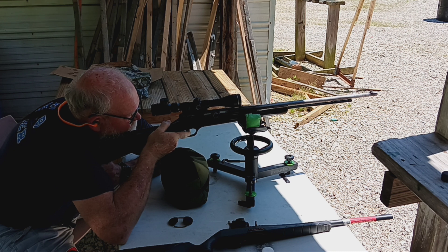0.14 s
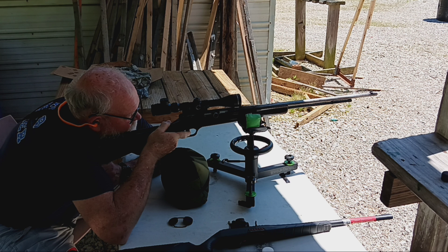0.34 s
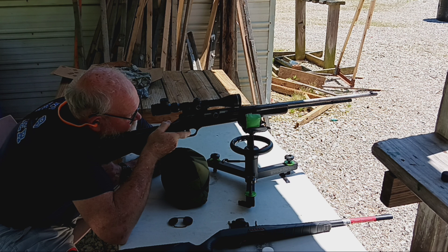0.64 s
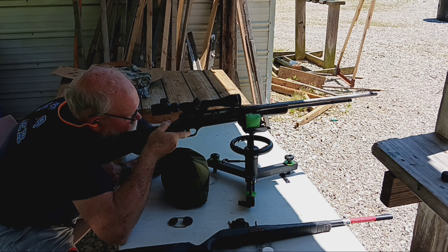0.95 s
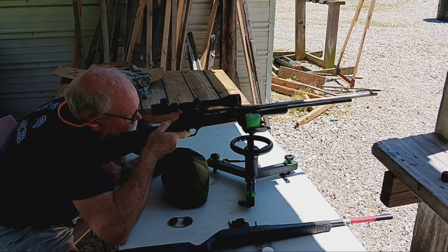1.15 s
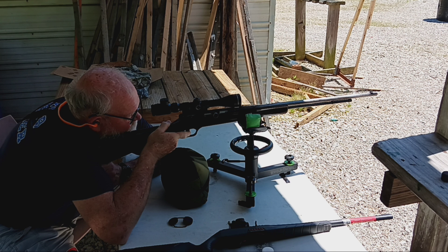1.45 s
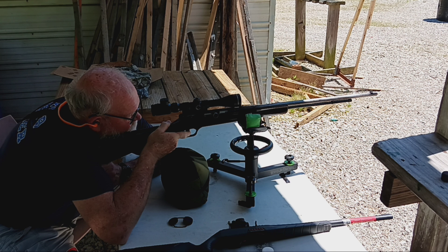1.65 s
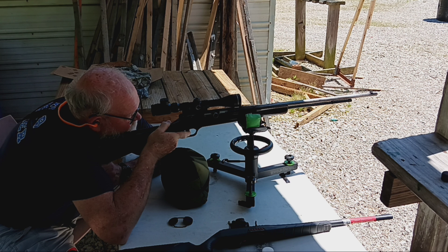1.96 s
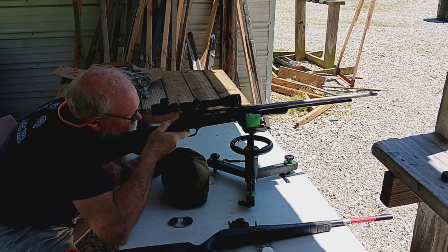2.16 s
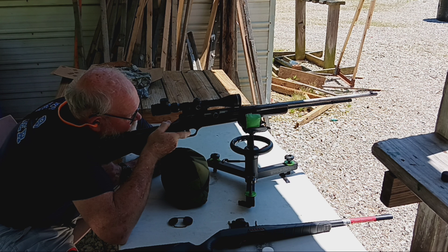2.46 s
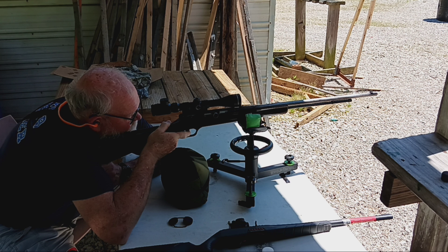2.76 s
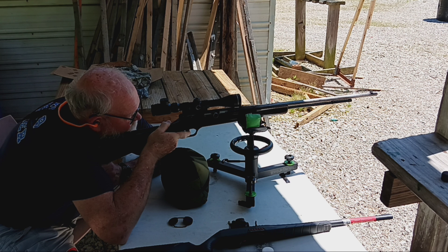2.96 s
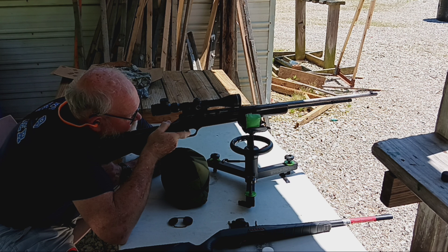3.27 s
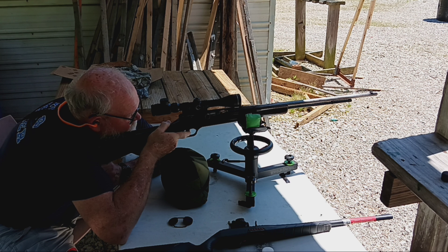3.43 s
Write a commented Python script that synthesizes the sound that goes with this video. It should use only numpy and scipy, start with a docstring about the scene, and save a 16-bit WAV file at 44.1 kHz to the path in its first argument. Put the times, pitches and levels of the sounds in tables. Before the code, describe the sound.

One overloading small-bore rifle shot after three quiet seconds of birds, faint ticks and scuffs

```python
"""Outdoor rifle range: a small-bore rifle is fired once from a roofed bench, overloading the microphone.
The report is shaped noise with pressure fronts; shed walls slap it back and the tree line rolls it on.
At the start the echo of an earlier shot, decaying noise, dies away. Before the shot come gliding-tone
songbirds, noise-burst scuffs and ticks at the bench, thin squeaks, light wind and a far engine's tones."""
import sys
import numpy as np
from scipy import signal
from scipy.fft import rfft, irfft
from scipy.io import wavfile
from scipy.ndimage import uniform_filter1d

SR = 44100
rng = np.random.default_rng(int(sys.argv[2]) if len(sys.argv) > 2 else 0)


def persist_wave(psi):
    """Save psi, clipped to +-1, as 16-bit WAV."""
    counts = np.round(np.clip(psi, -1, 1) * 32767).astype(np.int16)
    wavfile.write(sys.argv[1], SR, np.atleast_2d(counts).T)


N = 158760
T = np.arange(N) / SR
HZ = np.fft.rfftfreq(N, 1 / SR)

# stereo balance of background and bench noise: f/Hz, left-right level/dB
BACKGROUND_SIDE = [(60, 2), (200, 6.5), (1300, 5.5), (4400, 1), (7000, -1.5), (9000, -10.5), (11000, -25),
                   (15000, -15)]
# stereo balance of the report and its cracks: f/Hz, left-right level/dB
BLAST_SIDE = [(60, 6.5), (380, 3), (1200, 3), (2400, -0.5), (4400, -2.5), (7000, -3.5), (9000, -18),
              (11000, -34.5), (15000, -27)]


def amp(db):
    """Level as a logarithm: 20 dB is a factor of ten in amplitude."""
    return 10 ** (np.asarray(db) / 20)


def unit(x):
    """Normalisation to an rms of 1."""
    return x / np.sqrt(np.mean(x ** 2) + 1e-30)


def read(points, hz=HZ):
    """Linear interpolation of a spectrum table on a logarithmic frequency axis."""
    f, value = np.transpose(points)
    return np.interp(np.log(hz + 1), np.log(f + 1), value)


def pan(db):
    """Interaural level difference, split evenly between left and right gains."""
    return amp(np.array([[.5], [-.5]]) * db)


def octaves(hz):
    """Logarithmic pitch distance of every frequency from hz, in octaves."""
    return np.log2((HZ + 20) / hz)


def noise(tone_db, side_db, grain_db=0):
    """Spectral shaping of two uncorrelated noises; grain varies the size of single samples."""
    z = rng.standard_normal((2, N)) * amp(grain_db * rng.standard_normal((2, N)))
    return unit(irfft(rfft(z) * amp(tone_db) * pan(side_db), N))


def drift(width_s):
    """Gaussian low-pass filtering of noise: a slow random wander of rms 1."""
    return unit(irfft(rfft(rng.standard_normal(N)) * np.exp(-(HZ * width_s) ** 2), N))


def burst(start, rise, hold, decay):
    """Exponential decay after a linear attack; the hold is counted from the start."""
    attack = np.clip((T - start) / rise, 0, 1)
    return attack * np.exp(-np.maximum(T - start - hold, 0) / decay)


def swells(rows):
    """Addition of incoherent powers: each swell has a Gaussian rise and an exponential fall."""
    power = 0
    for top, db, rise, fall in rows:
        exponent = np.where(T < top, ((T - top) / rise) ** 2, 2 * (T - top) / fall)
        power = power + amp(db) ** 2 * np.exp(-exponent)
    return np.sqrt(power)


def woods(x):
    """Multiple scattering among trees: a random tail for each ear, each band dying at its own rate."""
    # time to fall by 60 dB: f/Hz, T60/s
    scatter_t60 = [(200, 1), (3000, 0.91), (10000, 0.24)]
    hz, t, z = signal.stft(rng.standard_normal((2, SR)), SR, nperseg=256)
    decay = amp(-60 * t / read(scatter_t60, hz)[:, None])
    tail = signal.istft(z * decay, SR, nperseg=256)[1]
    return signal.fftconvolve(x[None], tail / np.linalg.norm(tail[0]), axes=1)[:, :N]


def note(start, length, first_hz, middle_hz, last_hz, db, trill_hz):
    """Frequency modulation: a whistled glide with a quick trill and a slight random wobble."""
    trill_rate_hz, wobble_depth = 55.8, .007  # depth as a fraction of pitch
    t = np.arange(0, length, 1 / SR)
    wobble = unit(uniform_filter1d(rng.standard_normal(SR), 150))[:len(t)]
    glide = np.interp(t / length, [0, .5, 1], [first_hz, middle_hz, last_hz])
    hz = glide * (1 + wobble_depth * wobble) + trill_hz * np.sin(2 * np.pi * trill_rate_hz * t)
    envelope = np.sqrt(np.sin(np.pi * t / length))
    call = amp(db) * envelope * np.sin(2 * np.pi * np.cumsum(hz) / SR)
    return np.pad(call, (round(start * SR), N))[:N]


def air():
    """Broadband ambient noise: still air whose level swells slowly."""
    # spectrum: f/Hz, relative level/dB
    air_tone = [(15, -3), (25, 5.5), (79, -1), (113, -1.5), (140, -7), (240, -17), (313, -18.5),
                (500, -22.5), (800, -19), (1170, -25), (1900, -27.5), (7000, -36.5), (10200, -37),
                (12500, -50.5), (15500, -68)]
    level_db, swell_db = -61.5, 1
    return noise(read(air_tone), read(BACKGROUND_SIDE)) * amp(level_db + swell_db * drift(0.45))


def wind():
    """Low-frequency pressure noise at the microphone: puffs under Gaussian envelopes."""
    # puffs: t at the peak/s, level/dB, Gaussian standard deviation/s, left-right level/dB
    puffs = [(0.801, -50, 0.0074, 19), (1.099, -56, 0.015, -15), (1.159, -44.5, 0.017, -9),
             (1.539, -51, 0.011, 10), (1.632, -57.5, 0.032, 9), (1.944, -59, 0.029, -9),
             (2.199, -59.5, 0.035, -18), (2.364, -51, 0.056, -5), (2.559, -54, 0.048, -10)]
    # spectrum: f/Hz, relative level/dB
    wind_tone = [(20, 1), (45, 7.5), (80, -1), (150, -25), (400, -50), (2000, -95)]
    rumble = noise(read(wind_tone), 0)
    gusts = 0
    for s, db, half, side in puffs:
        gusts = gusts + amp(db) * pan(side) * np.exp(-.5 * ((T - s) / half) ** 2)
    return rumble * gusts


def engine():
    """Superposed partials: a far engine's hum, each partial wavering in pitch and level as it grows."""
    # partials: f/Hz, mean level at the end/dB
    partials = [(108, -69.5), (245, -77), (500, -85), (590, -87), (790, -82)]
    pitch_waver, level_waver_db = 0.0197, 2.65  # rms; pitch as a fraction
    growth = 2.44  # dB per s
    side_db = 5
    hum = 0
    for hz, db in partials:
        level = amp(db + growth * (T - T[-1]) + level_waver_db * drift(0.13))
        pitch = hz * (1 + pitch_waver * drift(0.1025))
        hum = hum + level * np.sqrt(2) * np.sin(2 * np.pi * np.cumsum(pitch) / SR)
    return hum * pan(side_db)


def old_echo():
    """Exponential decay, linear in dB: the far end of the earlier shot's roll."""
    # spectrum: f/Hz, relative level/dB
    old_tone = [(100, -33), (380, -24), (520, -6), (750, 2.5), (1300, 4), (2000, -4), (2700, -6),
                (3300, -21.5), (4500, -26), (8000, -52)]
    start_db, fade, flutter_db = -42.5, 33.3, 1  # fade in dB per s
    tail = noise(read(old_tone), read(BACKGROUND_SIDE))
    return tail * amp(start_db - fade * T + flutter_db * drift(0.011))


def rustles(grain_db):
    """Friction noise of cloth: sleeve rustles as soft swells of grainy noise."""
    # rustles: t at the top/s, level/dB, rise/s, fall/s
    rubs = [(.035, -70, 0.012, .05), (.18, -70, 0.019, .02), (.34, -67.5, .02, 0.083),
            (.51, -64, 0.036, 0.026), (.87, -61.5, 0.019, 0.057), (1.07, -70, 0.023, 0.041),
            (1.17, -61.5, 0.013, 0.059), (1.61, -69.5, 0.047, 0.062), (2.55, -79, 0.28, 0.11)]
    # spectrum: f/Hz, relative level/dB
    rustle_tone = [(400, -36), (1500, 10), (4500, 12), (8000, 0.5), (10300, 5), (12500, -23), (15500, -24)]
    return noise(read(rustle_tone), read(BACKGROUND_SIDE), grain_db) * swells(rubs)


def scuffs(grain_db):
    """Friction shaped by broad resonances: the rifle is settled on its rest."""
    # scuffs: t/s, hold/s, level/dB
    strokes = [(1.164, .045, -56.5), (1.209, .02, -53.5), (1.539, 0.044, -58.5), (1.583, 0.061, -63.5),
               (1.854, 0.047, -70), (1.92, 0.099, -75), (2.27, .03, -73.5)]
    # resonances: f/Hz, width/Hz, level before division by the root of the width/dB
    modes = [(821, 57, 1.5), (1343, 300, 3), (2100, 990, -4)]
    rise_s, fall_s = 0.0065, 0.017
    body = 0
    for hz, width, db in modes:
        body = body + amp(db) / np.sqrt(width) / (1 + (2 * (HZ - hz) / width) ** 2) ** 0.8
    power = sum((amp(db) * burst(s, rise_s, hold, fall_s)) ** 2 for s, hold, db in strokes)
    return noise(20 * np.log10(body), read(BACKGROUND_SIDE), grain_db) * np.sqrt(power)


def ticks(grain_db):
    """Impulsive excitation: small parts tick as short decaying noise bursts."""
    # ticks: t/s, level/dB, decay/s, tilt about 2 kHz/dB per octave
    knocks = [(0.531, -53, 0.025, -2.5), (.658, -56, 0.023, -0.5), (1.178, -53, 0.01, 19),
              (1.287, -58.5, 0.011, -2), (2.536, -56.5, 0.014, -4)]
    # spectrum: f/Hz, relative level/dB
    tick_tone = [(200, -11), (600, 4), (1500, 9), (3000, 6.5), (6000, 1), (10000, -3.5), (15000, -15)]
    out = 0
    for s, db, decay, tilt in knocks:
        tone = read(tick_tone) + tilt * octaves(2000)
        grains = noise(tone, read(BACKGROUND_SIDE), grain_db)
        out = out + grains * amp(db) * burst(s, 0.00076, 0.0044, decay)
    return out


def bench(grain_db=7, rough_db=4.0):
    """Irregular friction: rustles and scuffs share one random roughness, beside the ticks."""
    rub = rustles(grain_db) + scuffs(grain_db)
    return rub * amp(rough_db * drift(0.0062)) + ticks(grain_db)


def song():
    """Direct sound plus scattering: a repeated songbird phrase, each note with its own echo share."""
    # phrases: t/s, level/dB, length sung/s
    phrases = [(.155, -56, .4), (.587, -55, 0.45), (1.02, -57.5, 0.17)]
    # notes: delay/s, length/s, start f/Hz, middle f/Hz, end f/Hz, level/dB, trill depth/Hz, echo level/dB
    notes = [(0, 0.041, 4360, 3810, 3450, -10.5, 86, 11.5), (0.044, 0.1175, 2980, 3040, 3080, 0, 11, -4.5),
             (0.144, 0.17, 2443, 2690, 2506, -7, 206, 9), (.342, 0.041, 2480, 2040, 1860, -11.5, 33, 13)]
    side_db = 4
    direct, sent = 0, 0
    for s, db, length in phrases:
        for delay, *shape, echo_db in notes:
            call = amp(db) * (T < s + length) * note(s + delay, *shape)
            direct = direct + call
            sent = sent + call * amp(echo_db)
    return (direct + woods(sent)) * pan(side_db)


def whistles():
    """Scattering outweighs direct sound: thin whistles of other birds among the trees."""
    # whistles: t/s, length/s, start f/Hz, middle f/Hz, end f/Hz, level/dB, trill depth/Hz
    calls = [(0.353, .25, 6570, 6350, 6090, -68, 229.6), (1.4, 0.18, 4500, 4500, 4470, -72, 39),
             (1.696, 0.244, 4540, 4590, 4520, -76.5, 50)]
    direct_gain, side_db = 0.22, 1
    other = sum(note(*row) for row in calls)
    return (direct_gain * other + woods(other)) * pan(side_db)


def chips():
    """Discrete reflections: a short falling chip and its echoes, lightly scattered by the trees."""
    # chip and echoes: t/s, level/dB, middle f/Hz
    calls = [(2.3311, -51.5, 2900), (2.338, -52, 2910), (2.349, -56, 2820), (2.362, -63, 2680),
             (2.376, -67, 2650)]
    length_s, side_db = 0.0044, 8
    fall, wet = 0.15, 0.2  # pitch fraction above and below the middle; scattered gain
    chip = sum(note(s, length_s, hz * (1 + fall), hz, hz * (1 - fall), db, 0) for s, db, hz in calls)
    return (chip + wet * woods(chip)) * pan(side_db)


def squeaks(side_db=-14):
    """Frictional self-oscillation, drawn as thin steady whistles during scuffs."""
    # squeaks: t/s, length/s, f/Hz, level/dB
    whines = [(1.21, 0.068, 11430, -76), (1.562, 0.037, 11680, -63.5)]
    return sum(note(s, length, hz, hz, hz, db, 0) for s, length, hz, db in whines) * pan(side_db)


def report(grain_db=4, flutter_db=-0.5):
    """Frequency-dependent reverberation: roof and walls scatter the muzzle blast; the bass dies first."""
    # blast and near returns: t/s, level/dB, hold/s, decay factor, left-right level/dB, tilt/dB per octave
    arrivals = [(3.2012, -8.5, 0.028, 0.87, 2.5, 0.5), (3.2644, -2.5, 0.0027, 0.51, 4, -1),
                (3.278, -13, 0.0095, 1.86, 5, -0.5), (3.296, -22, 0.021, 0.31, 1, -2)]
    # spectrum: f/Hz, relative level/dB
    report_tone = [(40, 4), (150, -2.5), (420, 5.5), (750, 0), (1400, 1.5), (2500, 0), (4200, -1),
                   (6500, -5.5), (10000, -9), (12500, -25), (15500, -20.5)]
    # time to fall by 60 dB before the decay factor: f/Hz, T60/s
    report_t60 = [(60, 0.11), (300, 0.076), (1000, 0.18), (3500, 0.77), (8000, 0.44), (15000, 0.32)]
    rise_s = .0015
    spectrum = rfft(noise(read(report_tone), read(BLAST_SIDE), grain_db))
    centres = np.geomspace(60, 15360, 9)
    out = 0
    # overlapping octave bands whose shares add up to one
    for hz, share in zip(centres, np.eye(len(centres))):
        band = irfft(spectrum * read(list(zip(centres, share))), N)
        decay = read(report_t60, hz) / np.log(1000)
        height = np.log2(max(hz, 500) / 2000)  # octaves from 2 kHz, for the tilt
        power = 0
        for s, db, hold, slow, side, tilt in arrivals:
            envelope = burst(s, rise_s, hold, decay * slow)
            power = power + (envelope * amp(db + tilt * height) * pan(side)) ** 2
        out = out + band * np.sqrt(power)
    return out * amp(flutter_db * drift(.003))


def fronts():
    """Blast-wave pressure: a short push, then a longer suction, reaching the left port later."""
    # fronts thumping the microphone: t/s, peak before the band filter/dB, push/s, left-right level/dB
    thumps = [(3.2046, 0, 0.0016, 17.5), (3.212, -9.5, 0.0005, 28.5), (3.2247, -7, 0.0017, 1),
              (3.271, -1, 0.0013, 7), (3.2932, -7.5, 0.0045, 18.5), (3.307, -9, 0.0057, 23)]
    left_lag_s = 0.0011
    out = 0
    for s, db, length, side in thumps:
        u = (T - s - np.array([[left_lag_s], [0]])) / length
        out = out + (u > 0) * (1 - u) * np.exp(-abs(u)) * amp(db) * pan(side)
    band = signal.butter(2, (16, 570), "bandpass", fs=SR, output="sos")  # Hz
    return signal.sosfilt(band, out)


def slaps():
    """Specular reflection: single distinct echoes as band-limited noise bursts."""
    # slaps: t/s, level/dB, centre f/Hz, rise/s, decay/s, left-right level/dB
    returns = [(3.267, 0, 3160, 0.0017, 0.0034, 7), (3.307, 0, 1620, 0.00037, 0.0011, 5),
               (3.318, -6, 2050, 0.0019, 0.0072, 3), (3.415, -17.5, 2950, 0.028, 0.036, 9),
               (3.47, -19, 2100, 0.0018, 0.0036, 5), (3.48, -22.5, 450, 0.0068, 0.024, 4.5),
               (3.516, -10.5, 1230, 0.00054, 0.0044, 5.5), (3.591, -24, 560, 0.0008, 0.0055, 7)]
    half_width = 0.75  # octaves to the -6 dB points
    out = 0
    for s, db, hz, rise, decay, side in returns:
        tone = -6 * (octaves(hz) / half_width) ** 2
        out = out + noise(tone, side) * amp(db) * burst(s, rise, 0.0013, decay)
    return out


def cracks():
    """Impulsive reflection: bright cracks as sharp bursts of broadband noise."""
    # cracks: t/s, level/dB, decay/s
    snaps = [(3.378, -18.5, 0.0057), (3.3915, -9.5, 0.014)]
    # spectrum: f/Hz, relative level/dB
    crack_tone = [(50, 10.5), (300, 4.5), (700, 4.5), (2000, 2), (4500, 8.5), (8500, 8), (10500, 0.5),
                  (15500, -7.5)]
    envelope = sum(amp(db) * burst(s, 0.0011, 0.0017, decay) for s, db, decay in snaps)
    return noise(read(crack_tone), read(BLAST_SIDE)) * envelope


def roll(grain_db=5, flutter_db=1.6):
    """Diffuse reflection: the tree line rolls the shot back in fluttering swells of noise."""
    # swells: t at the top/s, level/dB, rise/s, fall/s
    rolls = [(3.375, -34, 0.01, 0.081), (3.468, -18, 0.024, 0.063), (3.52, -15, 0.024, 0.057),
             (3.578, -19.5, 0.021, 0.26)]
    # spectrum: f/Hz, relative level/dB
    roll_tone = [(35, -28), (60, -21), (187, -23), (343, -17.5), (413, -16), (889, -6.5), (1830, -3.5),
                 (2050, -2.5), (3340, -9), (4520, -9), (10400, -23.5), (15500, -73)]
    # stereo balance: f/Hz, left-right level/dB
    roll_side = [(60, 7), (400, 6), (800, 10.5), (2400, 5.5), (4400, 1), (7500, 4), (9000, -10),
                 (11000, -18.5), (15000, -59)]
    diffuse = noise(read(roll_tone), read(roll_side), grain_db)
    return diffuse * swells(rolls) * amp(flutter_db * drift(0.0055))


def shelter(x, count=10):
    """Early reflections: bench, posts and roof return the sound above the bass, unlike at each ear."""
    reflection_db, latest_s = -18, .008
    taps = np.zeros((2, 2048))
    for row in taps:
        delay, sign = rng.random((count, 2)).T
        samples = np.clip((delay * latest_s * SR).astype(int), 1, 2047)
        row[samples] = np.sign(sign - .5) * amp(reflection_db)
    reflected = signal.oaconvolve(x, taps, axes=1)[:, :N]
    no_bass = signal.butter(1, 600, "highpass", fs=SR, output="sos")
    bounced = signal.sosfilt(no_bass, reflected)
    return (x + bounced) / np.sqrt(1 + count * amp(reflection_db) ** 2)


def scene():
    """Linear superposition of everything that reaches the microphone."""
    shot = report() + roll() + slaps() + cracks()
    sheltered = shelter(shot + old_echo() + bench())
    birds = song() + whistles() + chips()
    outdoors = air() + wind() + engine()
    return sheltered + fronts() + birds + squeaks() + outdoors


def record(dry):
    """Saturation, as the shot overloads the input, followed by low-pass band limiting."""
    ceiling, edge_hz = 0.93, 15850  # ceiling in full-scale amplitude, before the low-pass
    clipped = dry / (1 + (dry / ceiling) ** 8) ** (1 / 8)
    lowpass = signal.firwin(401, edge_hz, window=("kaiser", 7), fs=SR)
    return signal.oaconvolve(clipped, lowpass[None], "same")


dry = scene()
out = record(dry)
persist_wave(out)
```